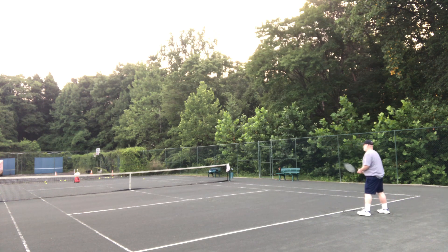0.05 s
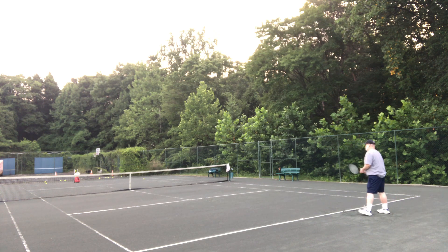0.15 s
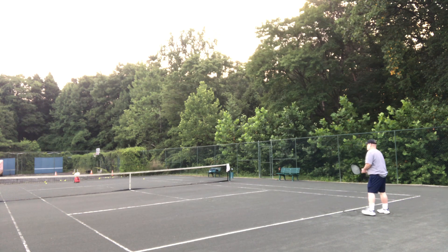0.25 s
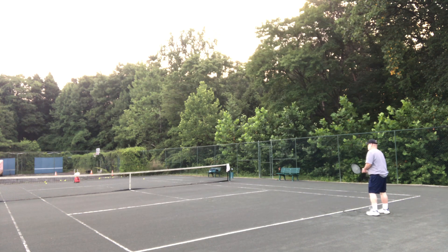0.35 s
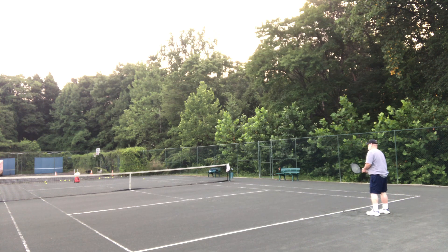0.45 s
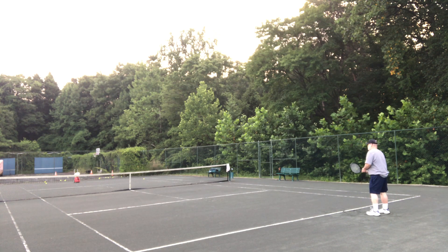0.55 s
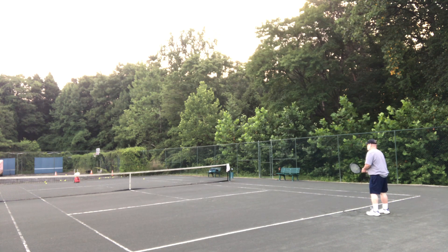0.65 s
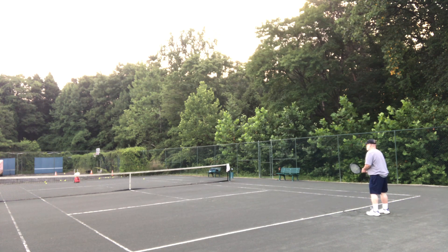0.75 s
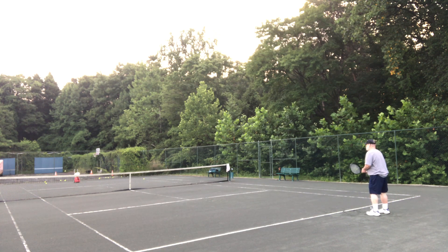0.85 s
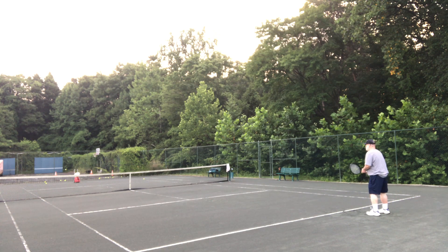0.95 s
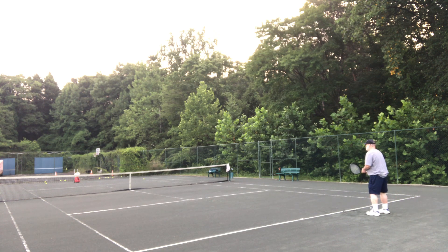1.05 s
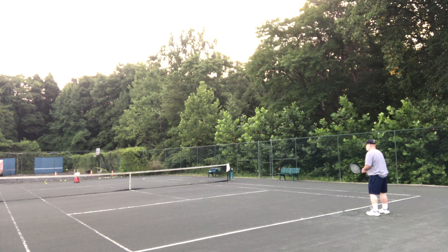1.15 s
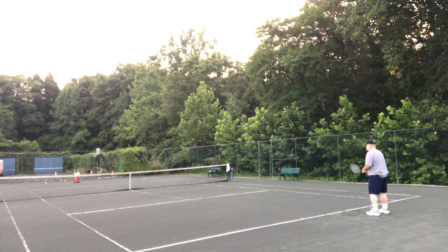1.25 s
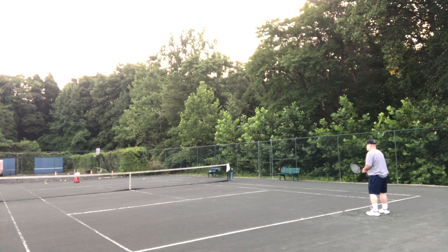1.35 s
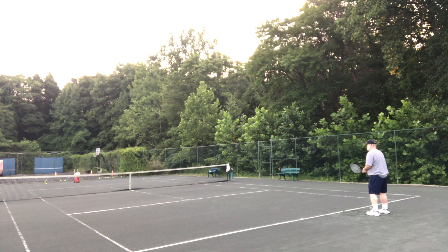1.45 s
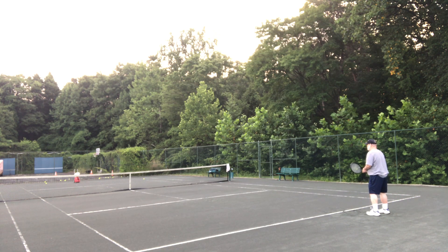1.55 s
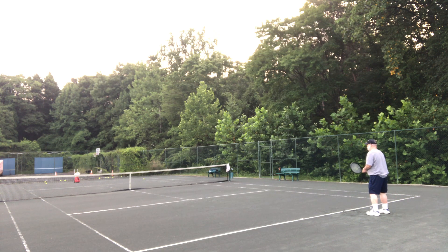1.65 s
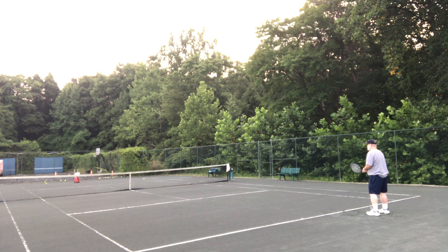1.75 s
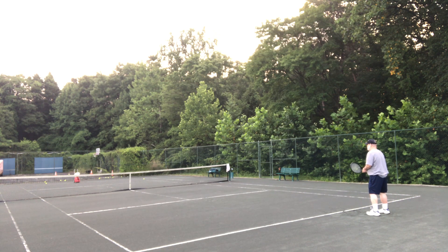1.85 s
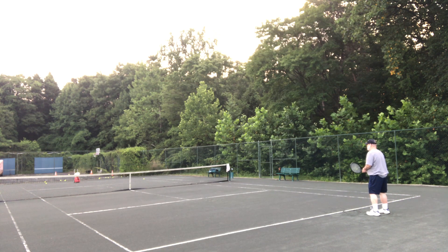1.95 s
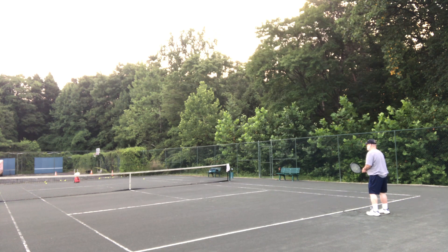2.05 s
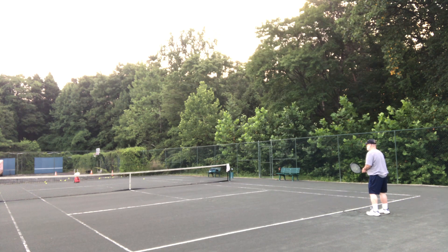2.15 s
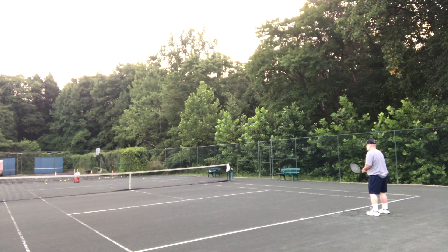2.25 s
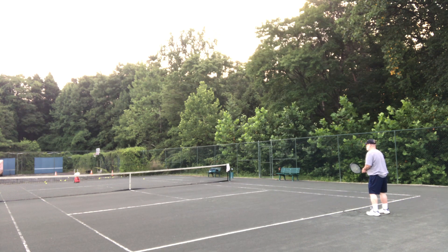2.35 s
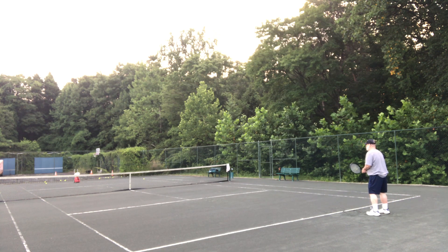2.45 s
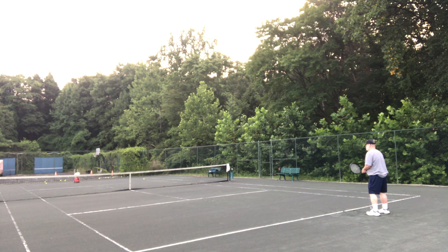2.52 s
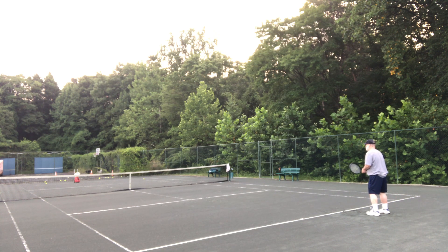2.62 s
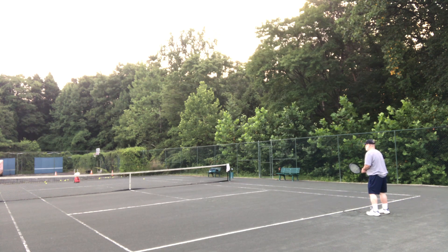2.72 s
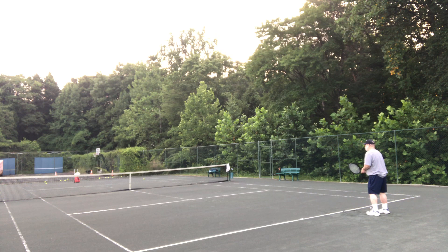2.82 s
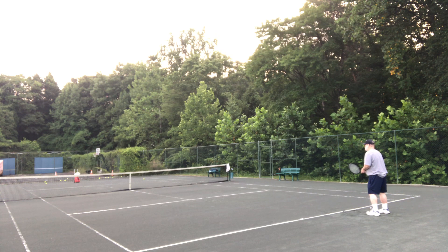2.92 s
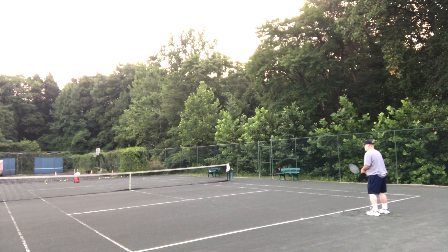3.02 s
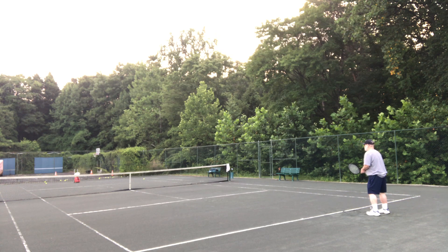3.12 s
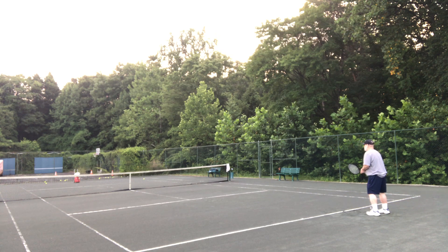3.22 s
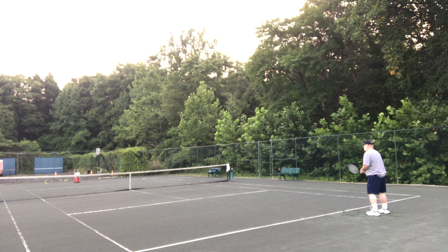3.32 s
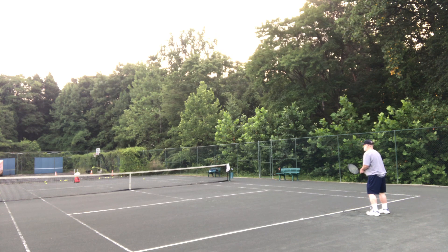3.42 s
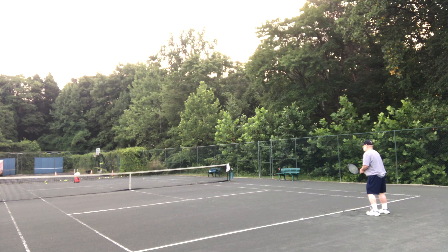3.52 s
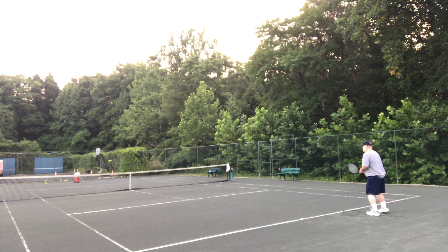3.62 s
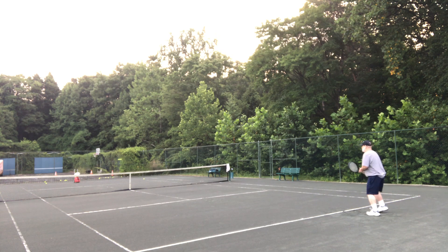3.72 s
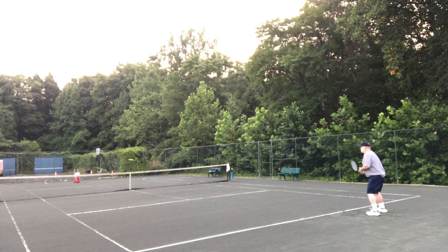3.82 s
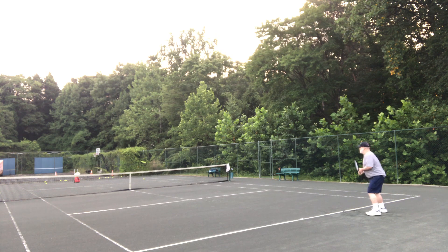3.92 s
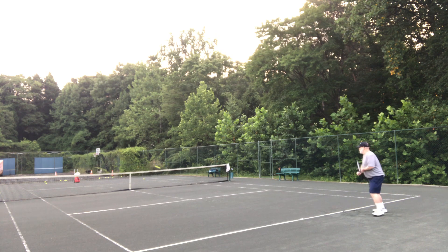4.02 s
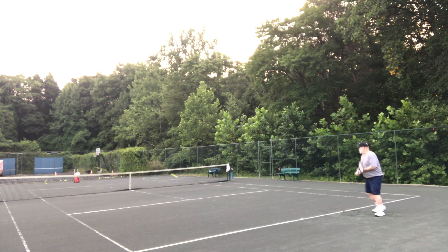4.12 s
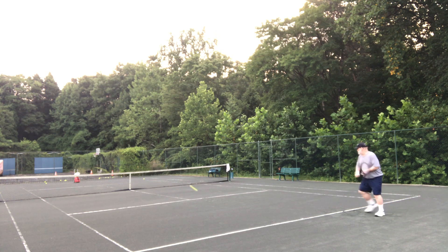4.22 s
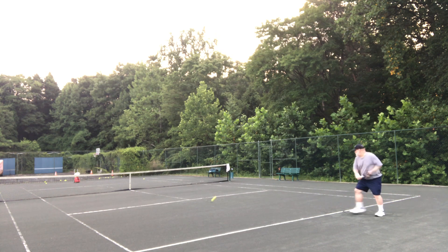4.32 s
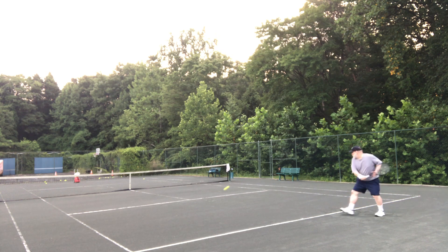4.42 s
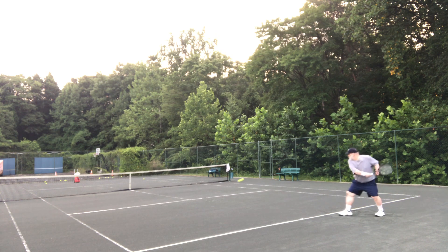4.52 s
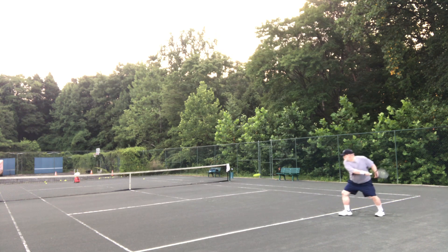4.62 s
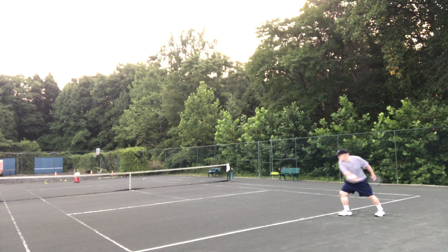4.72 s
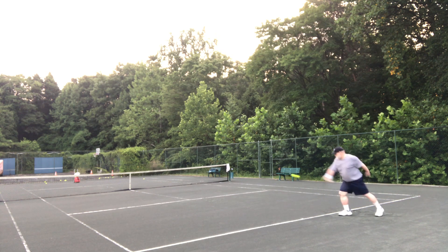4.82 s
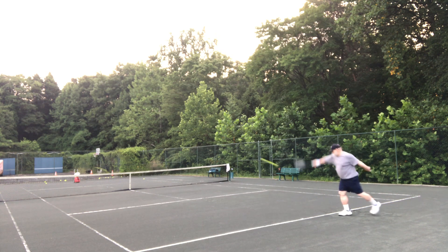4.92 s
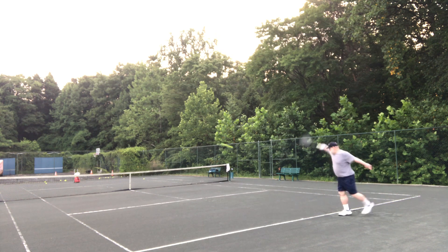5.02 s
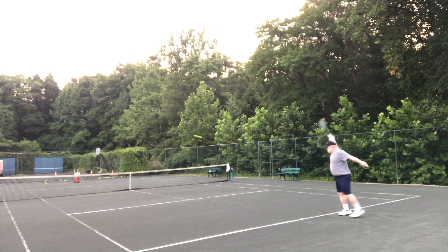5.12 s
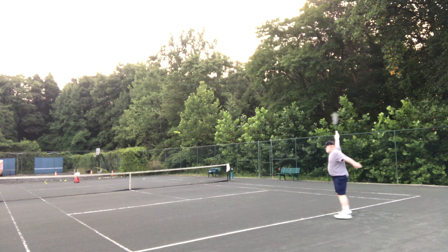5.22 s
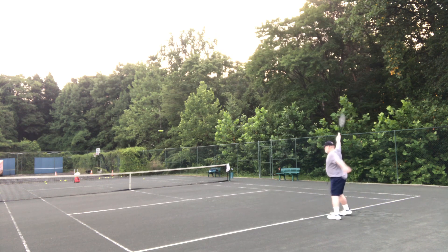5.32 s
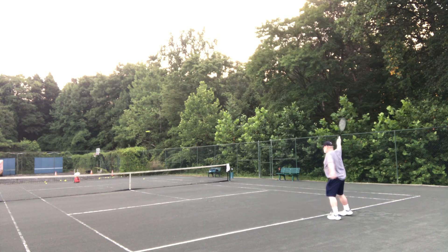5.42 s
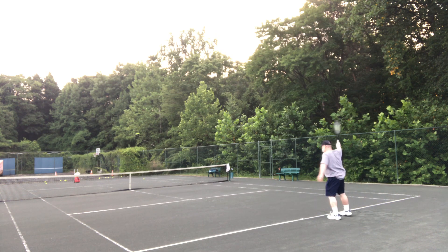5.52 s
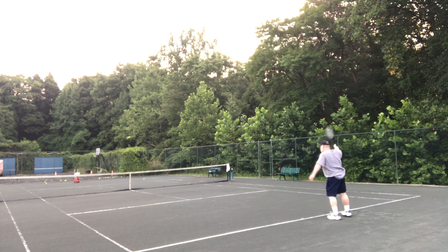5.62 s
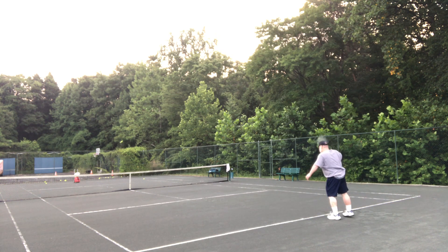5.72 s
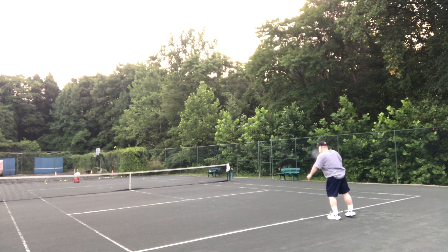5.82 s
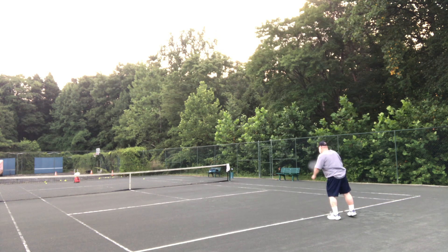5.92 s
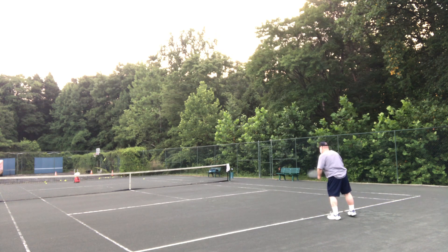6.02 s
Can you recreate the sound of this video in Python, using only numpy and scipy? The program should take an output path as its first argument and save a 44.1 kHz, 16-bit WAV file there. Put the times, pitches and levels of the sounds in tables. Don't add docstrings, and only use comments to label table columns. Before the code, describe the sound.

Throughout, near crickets trill rapidly at a high pitch over a blurred far insect chorus, low, slowly rising traffic wash and a ball machine's faint whine and hum. A near wren whistles short phrases at 0.1 and 0.5 seconds, with a farther wren until about 1.2. A shoe shifts at 0.4, and a distant metal hinge squeaks faintly at 0.9. From 2 to 3.7 the far wren repeats quick phrases, with tiny bird chips and a thin high call around 2.2. At 3.3 the machine makes a dull hollow pop. Soles scuff grit from 3.7 while a far engine swells and fades around 3.95. The ball bounces with a small dry thud at 4.4; more steps follow, then racket strings crack sharply at 4.93, the loudest event, echoing off trees. A chip comes at 5.2, gritty steps and a drag around 5.3, then insects and traffic continue to 6.

```python
import sys
import numpy as np
from scipy import signal
from scipy.fft import rfft, irfft
from scipy.io import wavfile
from scipy.ndimage import uniform_filter1d

SR = 44100
rng = np.random.default_rng(int(sys.argv[2]) if len(sys.argv) > 2 else 0)


def gain_from_decibels(decibels):
    exponent = np.asarray(decibels, float) / 20
    return 10 ** exponent


def int16_out(signal):
    q = np.round(np.clip(np.atleast_2d(signal).T, -1, 1) * 32767)
    wavfile.write(sys.argv[1], SR, q.astype(np.int16))


N = 267687

# delay/s,
# f/Hz, level/dB, t60/s, rise/s, fade power/1 (1 rings on, 2 is felt-choked)
POP_MODES = [(-.002, 350, -36, .06, .002, 1.1), (.0022, 1060, -20, .012, .003, 2.2),
             (.0105, 950, -29, .025, .001, 1.2), (.005, 770, -33, .03, .002, 1.1),
             (.012, 620, -30, .02, .001, 1.1), (.004, 1770, -43, .04, .001, 1.1),
             (.026, 370, -37, .05, .002, 1.1), (.006, 200, -45, .15, .003, 1.1)]
BOUNCE_MODES = [(.0001, 1130, -25.5, .0075, .0004, 1.75), (.00025, 210, -28, .035, .0021, .9),
                (0, 1280, -38, .035, .0008, .95), (.0017, 770, -41, .034, .0006, .98)]
STRIKE_MODES = [(0, 2210, -19, .0084, .0005, 1.1), (.0014, 298, -13, .02, .00135, 1.3),
                (.004, 1060, -4.8, .00515, .00065, 3.3), (.0079, 1100, -17, .0225, .0003, .9),
                (.00426, 1815, -24.5, .05, .0004, 1.1), (.0033, 708, -13, .028, .0045, 1.05),
                (.00034, 1180, -25, .027, .0005, 1.6), (.002, 3190, -34, .04, .0004, 1.1),
                (.0018, 160, -27, .032, .006, 1.6), (.012, 2110, -42, .14, .003, .95),
                (.012, 2255, -43, .14, .003, .95), (.012, 930, -40, .12, .003, .95),
                (.01, 600, -51, .6, .005, .95)]
# f/Hz, density/dB
POP_ECHO = [(100, -10), (300, 0), (700, -4), (1050, -8), (1400, -19), (2500, -21), (4000, -24), (7000, -45)]
STRIKE_ECHO = [(150, -16), (350, -6), (950, 0), (1400, -7), (2100, -4), (2800, -11.5), (4500, -17),
               (9000, -32)]
# f/Hz, density/dB
GRIT_SPECTRUM = [(1500, -20), (2500, -4), (5000, 0), (8000, -3.5), (12000, -11), (15800, -12)]
SOLE_SPECTRUM = [(200, -22), (450, -8), (1000, -1.5), (1600, 0), (2500, -6), (4500, -12), (7000, -28)]
# t/s, length/s, grit level/dB, sole level/dB
STAMPS = [(.392, .06, -72, -55), (.9, .2, -73, -80), (3.745, .02, -74, -62), (3.819, .045, -72, -47.5),
          (4.112, .03, -59, -60), (4.14, .04, -68, -60), (4.228, .02, -63, -68), (4.515, .02, -62, -64),
          (4.61, .06, -69, -60), (4.68, .07, -69, -61), (4.995, .09, -65, -56), (5.305, .03, -54, -49),
          (5.41, .18, -65, -61), (5.75, .04, -78, -66)]
# t/s, length/s, grit level/dB, sole level/dB
DRAGS = [(.15, .08, -67, -80), (3.87, .1, -66, -57), (4.53, .07, -67, -58), (4.81, .13, -58, -56),
         (5.325, .085, -59, -45)]
# t/s, length/s, from f/Hz, to f/Hz, level/dB
NEAR_WREN_PHRASE = [(-.168, .038, 2750, 3120, -6), (-.134, .04, 3120, 2880, -4),
                    (-.034, .03, 3680, 3100, -6), (-.004, .11, 2340, 2710, 2.5)]
FAR_WREN_PHRASE = [(-.004, .034, 3640, 3080, -1), (.044, .036, 2780, 2080, -1),
                   (.074, .034, 2080, 2400, -1), (.15, .04, 2150, 2420, -7), (.203, .018, 2820, 2620, -4),
                   (.21, .048, 2620, 3090, 3), (.282, .08, 3430, 3960, 3.5)]
CHIP_NOTES = [(0, .013, 6500, 8400, -1), (.008, .018, 8350, 7400, -1), (.014, .018, 9050, 8100, -7),
              (.022, .022, 7800, 6700, -6)]
# t/s, length/s, from f/Hz, to f/Hz, level/dB
STRAY_NOTES = [(-.002, .06, 2780, 3060, -62), (-.01, .05, 2350, 2050, -67), (.485, .08, 3750, 3930, -65),
               (1.21, .02, 3000, 2750, -70), (1.245, .02, 2900, 2500, -70)]
THIN_CALL = [(2.17, .3, 8930, 9050, -85)]
# t/s, level/dB
NEAR_WREN_STARTS = [(.094, -58), (.524, -57)]
FAR_WREN_STARTS = [(-.225, -73), (.245, -70), (.716, -65), (2.04, -65), (2.512, -63), (2.975, -63),
                   (3.443, -64)]
CHIP_STARTS = [(-.02, -73), (.135, -73), (1.875, -73), (2.03, -75), (2.6, -68), (4.035, -72), (4.17, -76),
               (5.163, -67)]
# delay/s, level/dB
TRUNK_ECHOES = [(.048, -8), (.075, -4), (.125, -9)]
# f/Hz, width/Hz, level/dB
HINGE_MODES = [(3200, 130, -61.5), (6350, 120, -76), (9150, 160, -73), (12500, 900, -87)]
# pulse rate/Hz, start f/Hz, end f/Hz, pulse length/s, level/dB
CRICKETS = [(42.7, 4960, 4400, .012, -64.5), (53.3, 4880, 4500, .01, -64.5)]
# f/Hz, width/Hz, level/dB
CHORUS_BANDS = [(4700, 520, -64), (5450, 700, -65), (9300, 900, -88)]
# f/Hz, width/Hz, level/dB
MOTOR_BANDS = [
    (1415, 14, -73.5),
    (120, 12, -66),
]
# f/Hz, density/dB
AIR_SPECTRUM = [(25, -40), (45, -4), (62, 2.5), (110, 1.5), (240, -5), (500, -16), (950, -9.5),
                (1500, -15.5), (2300, -27.5), (3500, -27), (6300, -25), (7600, -36), (10500, -41),
                (16000, -39.5)]
# f/Hz, t60/s
TREE_T60 = [(200, .4), (1000, .55), (2100, .75), (3000, .95), (3900, .8), (8000, .75), (15000, .4)]
# longest glide/s, sag/(Hz/s), fade/(dB/s)
NEAR_VOICE, FAR_VOICE, CHIP_VOICE = (.1, 100, 12), (.032, 1500, 110), (.035, 100, 100)


def evened(x):
    return x / np.sqrt(np.mean(x ** 2) + 1e-20)


def noise(count):
    return rng.standard_normal(count)


def read(points, hz):
    f, value = np.transpose(points)
    return np.interp(np.log(hz + 1), np.log(f + 1), value)


def add(mix, start_s, sound):
    at = round(start_s * SR)
    sound = sound[max(-at, 0):]
    part = mix[max(at, 0):][:len(sound)]
    part += sound[:len(part)]


def coloured(x, points):
    gain = gain_from_decibels(read(points, np.fft.rfftfreq(len(x), 1 / SR)))
    return evened(irfft(rfft(x) * gain, len(x)))


def resonate(x, hz, width_hz):
    turn = np.exp(2j * np.pi * hz * np.arange(len(x)) / SR)
    r = np.exp(-np.pi * width_hz / SR)
    smooth = signal.lfilter([(1 - r) ** 2], [1, -2 * r, r * r], x / turn)
    return 2 * (turn * smooth).real


def bands(table, count):
    return sum(gain_from_decibels(db) * evened(resonate(noise(count), hz, width_hz)) for hz, width_hz, db in table)


def drift(hz):
    knots = noise(int(N / SR * 200) + 2)
    knots = evened(signal.lfilter([1], [1, -np.exp(-hz / 30)], knots))
    return np.interp(np.arange(N), np.linspace(0, N, len(knots)), knots)


def placed(x, trees_db):
    return np.array([x, gain_from_decibels(trees_db) * x])


def hit(modes, echo, at_s, crack_db, crack_t60_s, tilt_db_per_octave, trees_db):
    t, out = np.arange(SR // 4) / SR, np.zeros((2, N))
    crack_spectrum = [(500, -30), (1500, 0), (16000, tilt_db_per_octave * np.log2(16000 / 1500))]
    crack_envelope = gain_from_decibels(crack_db - 60 * t / crack_t60_s) * (1 - np.exp(-t / .0008))
    add(out[0], at_s, crack_envelope * coloured(noise(len(t)), crack_spectrum))
    for delay_s, hz, db, t60_s, rise_s, power in modes:
        envelope = gain_from_decibels(db - 60 * (t / t60_s) ** power) * (1 - np.exp(-(t / rise_s) ** 2))
        add(out[0], at_s + delay_s, envelope * np.sin(2 * np.pi * hz * t))
    add(out[1], at_s, gain_from_decibels(trees_db - 60 * t / .03) * coloured(noise(len(t)), echo) / 4)
    return out


def ball():
    pop = hit(POP_MODES, POP_ECHO, at_s=3.334, crack_db=-46, crack_t60_s=.06,
              tilt_db_per_octave=-15, trees_db=-19.3)
    bounce = hit(BOUNCE_MODES, STRIKE_ECHO, at_s=4.3805, crack_db=-41, crack_t60_s=.012,
                 tilt_db_per_octave=-3.5, trees_db=-36)
    strike = hit(STRIKE_MODES, STRIKE_ECHO, at_s=4.9338, crack_db=-24, crack_t60_s=.03,
                 tilt_db_per_octave=-6, trees_db=-18.5)
    return pop + bounce + strike


def shoes():
    grains_per_s = 16000
    grains = noise(N) * gain_from_decibels(1.7 * rng.exponential(1, N)) * (rng.random(N) < grains_per_s / SR)
    grit = coloured(grains, GRIT_SPECTRUM)
    sole = coloured(grains + 1.5 * noise(N), SOLE_SPECTRUM)
    out = np.zeros(N)
    for table, rise_share in [(STAMPS, .04), (DRAGS, .62)]:
        for start_s, length_s, grit_db, sole_db in table:
            t, at = np.arange(0, length_s, 1 / SR), round(start_s * SR)
            stroke = np.interp(t, [0, rise_share * length_s, length_s], [0, 1, 0]) ** .6
            span = slice(at, at + len(t))
            add(out, start_s, stroke * (gain_from_decibels(grit_db) * grit[span] + gain_from_decibels(sole_db) * sole[span]))
    return placed(out * gain_from_decibels(1.6 * drift(60.)), -12)


def whistle(length_s, from_hz, to_hz, db, glide_s, sag_hz_per_s, fade_db_per_s):
    t = np.arange(0, length_s, 1 / SR)
    glide_s = min(glide_s, length_s)
    linger = 1.45
    share = np.sin(np.pi / 2 * np.minimum(t / glide_s, 1) ** linger) ** 2
    hz = from_hz + (to_hz - from_hz) * share - sag_hz_per_s * np.maximum(t - glide_s, 0)
    waver = 1 + .004 * evened(uniform_filter1d(noise(len(t)), 150))
    tone = np.sin(2 * np.pi * np.cumsum(hz * waver) / SR)
    return np.sqrt(2) * gain_from_decibels(db - fade_db_per_s * t) * tone * signal.windows.tukey(len(t), .4)


def song(phrase, voice, starts, trees_db, trunks=()):
    out = np.zeros(N)
    for start_s, db in starts:
        for note_s, *pitch in phrase:
            note = whistle(*pitch, *voice)
            for late_s, echo_db in [(0, 0), *trunks]:
                add(out, start_s + note_s + late_s, gain_from_decibels(db + echo_db) * note)
    return placed(out, trees_db) * gain_from_decibels([1.8 * drift(50.), 4.5 * drift(90.)])


def birds():
    once = [(0, 0)]
    wrens = song(NEAR_WREN_PHRASE, NEAR_VOICE, NEAR_WREN_STARTS, -2.2)
    wrens = wrens + song(FAR_WREN_PHRASE, FAR_VOICE, FAR_WREN_STARTS, -3.5, TRUNK_ECHOES)
    lone = song(STRAY_NOTES, FAR_VOICE, once, -1.2) + song(THIN_CALL, NEAR_VOICE, once, 1.5)
    return wrens + lone + song(CHIP_NOTES, CHIP_VOICE, CHIP_STARTS, 4.4)


def gate():
    start_s, length_s = .925, .17
    t, out = np.arange(0, length_s, 1 / SR), np.zeros(N)
    push = np.interp(t, [0, .002, length_s], [0, 1.3, 0]) ** 1.1
    add(out, start_s, push * bands(HINGE_MODES, len(t)))
    return placed(out * gain_from_decibels(4 * drift(40.)), -3)


def cricket(rate_hz, start_hz, end_hz, length_s, db):
    cycles = np.cumsum(rate_hz * (1 + .03 * drift(8.))) / SR + rng.random()
    since_s = cycles % 1 / rate_hz
    share = np.clip(since_s / length_s, 0, 1)
    hz = (start_hz + (end_hz - start_hz) * share) * (1 + .008 * drift(25.))
    phase = 2 * np.pi * np.cumsum(hz) / SR
    strokes = np.sin(np.pi * share) ** 1.5 * (np.sin(phase) + gain_from_decibels(-28) * np.sin(2 * phase))
    return gain_from_decibels(db + 2.5 * drift(15.)) * evened(strokes)


def insects():
    near = sum(cricket(*row) for row in CRICKETS)
    far = sum(gain_from_decibels(1.2 * drift(30.)) * bands([row], N) for row in CHORUS_BANDS)
    return near + far


def traffic():
    frames, hz = N // 1024 + 5, np.fft.rfftfreq(2048, 1 / SR)
    shape = (len(hz), frames)
    patches = evened(uniform_filter1d(uniform_filter1d(noise(shape), 20, 0), 4, 1))
    t = np.arange(frames) * 1024 / SR
    rise_db_per_s, wander_db, wander_hz = .45, .8, 1.2
    swell_db = rise_db_per_s * (t - t.mean()) + wander_db * np.sin(2 * np.pi * wander_hz * t + 2.5)
    field_db = read(AIR_SPECTRUM, hz)[:, None] + .8 * patches + swell_db / (1 + hz[:, None] / 600)
    field = (noise(shape) + 1j * noise(shape)) * gain_from_decibels(field_db)
    window = np.sqrt(signal.get_window("hann", 2048))
    wash = signal.istft(field, window=window, nperseg=2048)[1][:N]
    return gain_from_decibels(-56) * evened(wash)


def motor():
    return bands(MOTOR_BANDS, N)


def passing_engine():
    peak_s, spread_s = 3.95, .16
    swell = np.exp(-((np.arange(N) / SR - peak_s) / spread_s) ** 2)
    return swell * bands([(192, 22, -63)], N)


def trees(x):
    taps = np.zeros(SR)
    at = np.arange(300, SR - 20, 20) + rng.integers(0, 20, (SR - 301) // 20)
    taps[at] = rng.choice([-1., 1.], at.shape)
    hz, t, z = signal.stft(taps, SR, nperseg=256)
    decay = gain_from_decibels(-60 * t / read(TREE_T60, hz)[:, None])
    tail = signal.istft(z * decay, SR, nperseg=256)[1]
    return signal.fftconvolve(x, tail / np.linalg.norm(tail))[:N]


def scene():
    direct, sent = ball() + shoes() + birds() + gate()
    background = insects() + traffic() + motor() + passing_engine()
    return (direct + trees(sent) + background)[None]


def roll_off(x):
    return signal.sosfilt(signal.butter(12, 16470, fs=SR, output="sos"), x)


def record(dry):
    thin = signal.sosfilt(signal.butter(3, 37, "highpass", fs=SR, output="sos"), dry)
    lowpass = signal.firwin(511, 15780, window=("kaiser", 9), fs=SR)
    limited = signal.oaconvolve(thin, lowpass[None], "same")
    return roll_off(limited)


dry = scene()
out = record(dry)
int16_out(out)
```